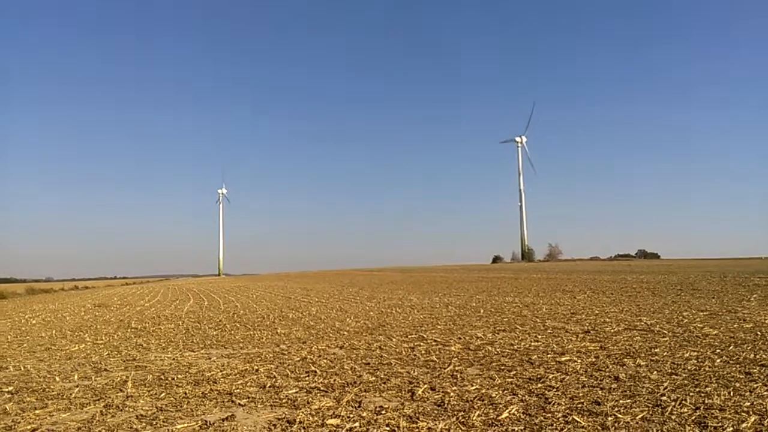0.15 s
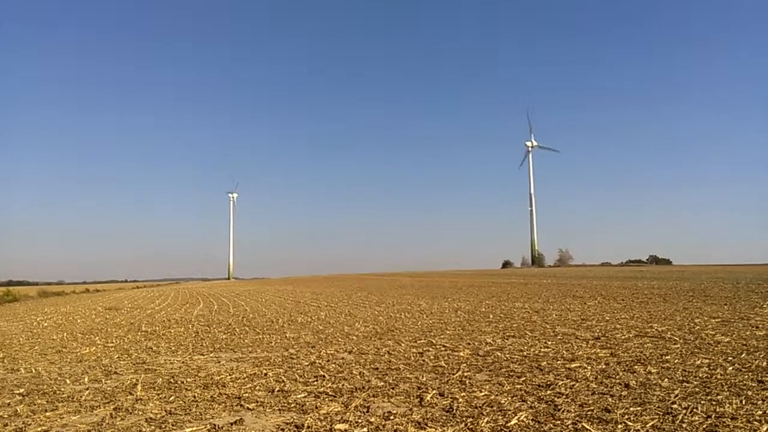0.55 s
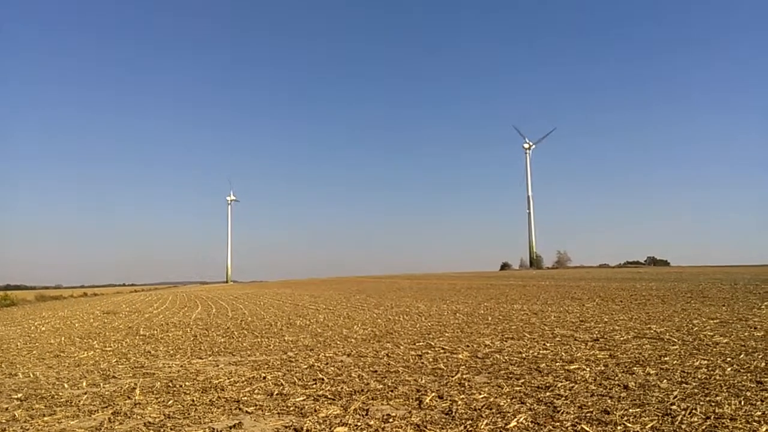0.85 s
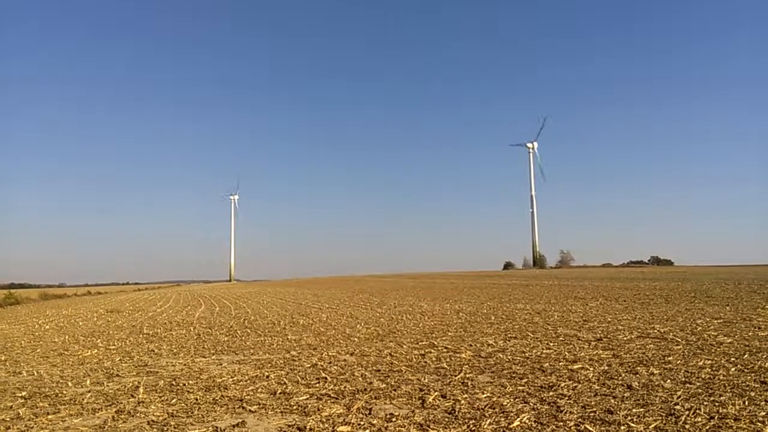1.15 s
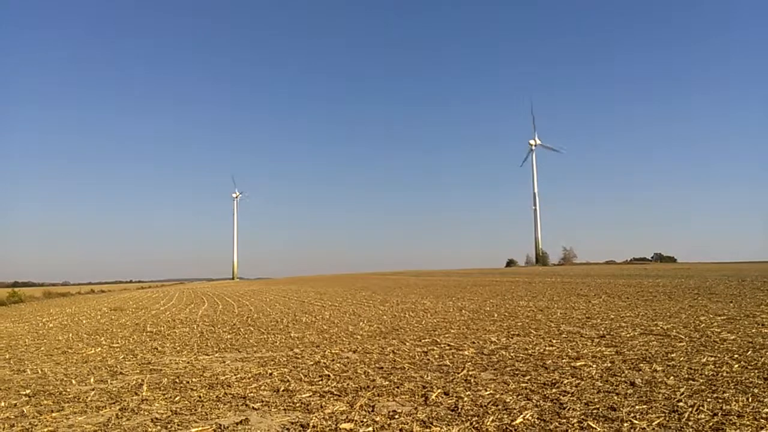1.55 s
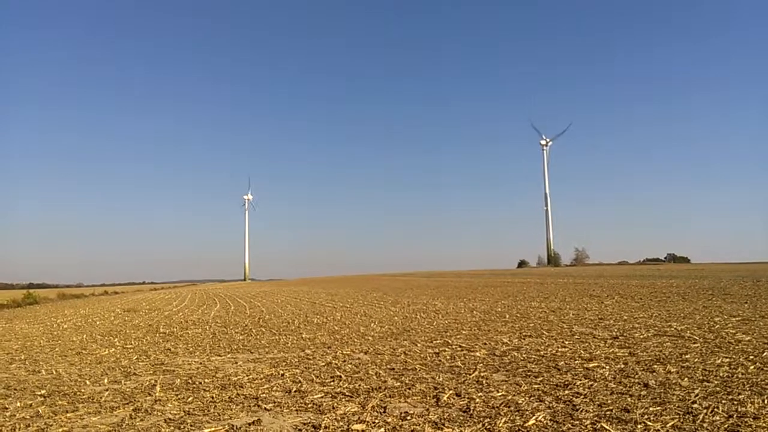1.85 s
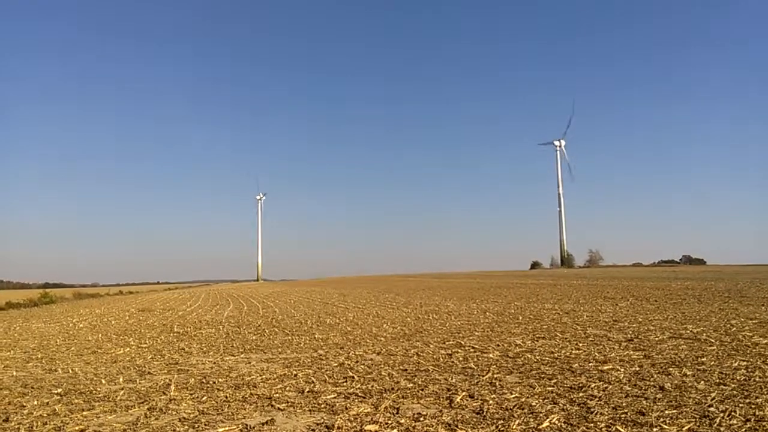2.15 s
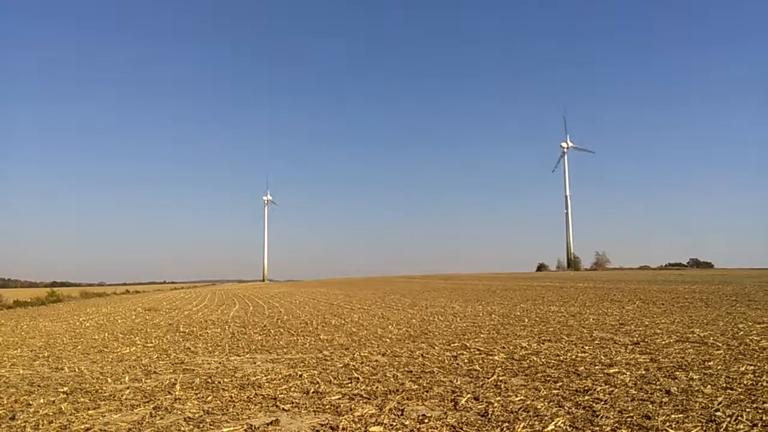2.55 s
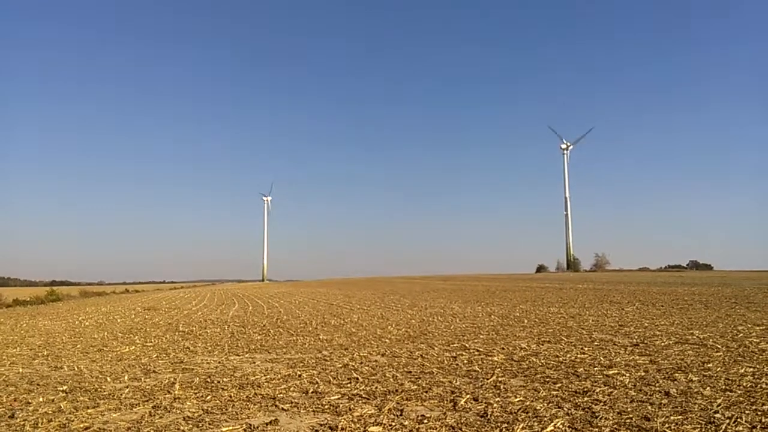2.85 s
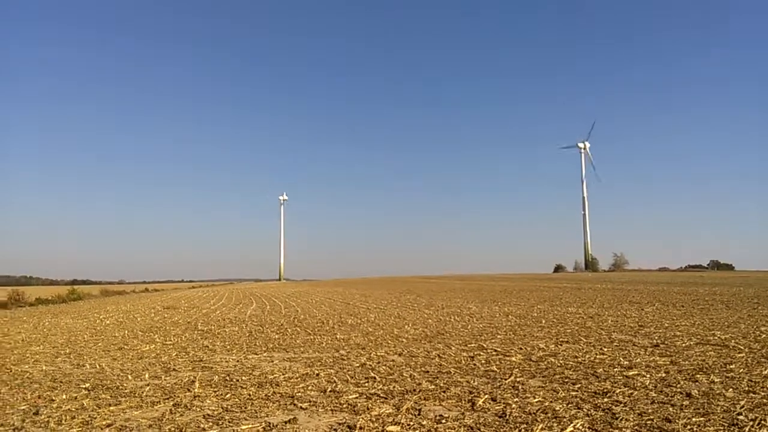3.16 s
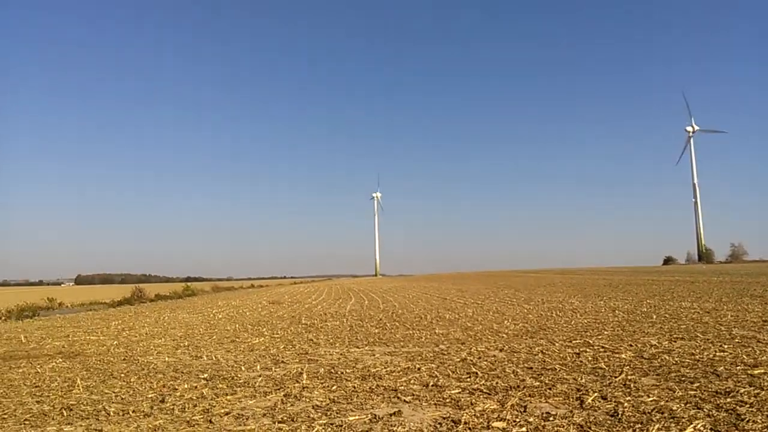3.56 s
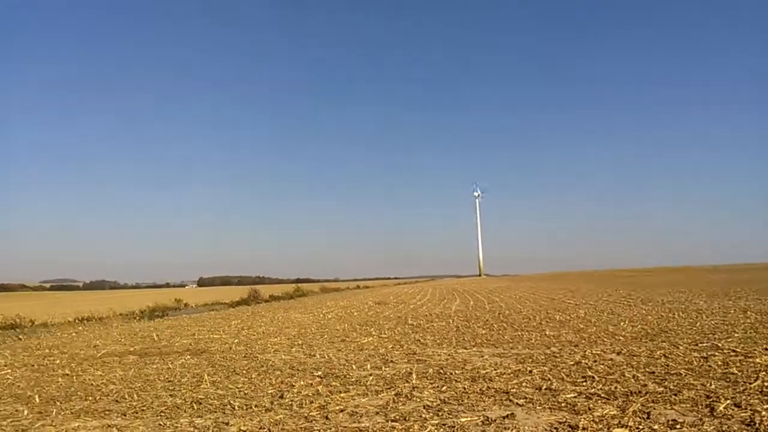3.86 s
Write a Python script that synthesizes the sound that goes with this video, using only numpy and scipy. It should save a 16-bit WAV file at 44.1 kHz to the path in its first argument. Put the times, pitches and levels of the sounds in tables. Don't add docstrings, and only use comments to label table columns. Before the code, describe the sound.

Gusty wind buffets a bare microphone in an open field: deep, irregular thumps and flutters, dense until 1.4 s, with tiny buzzes near 0.5 s, patchier afterward, surging at 2.3-2.9 s, then mostly calm with blows near 3.6 s. Far beneath, turbine blades swish softly about every 0.66 s over a faint drone and rumble. Thin insect notes come after 2.2 s, clearest near 3.5; dry stalks rustle, snapping faintly at 3.8 and 3.95.

```python
import sys
import numpy as np
from scipy import signal
from scipy.fft import rfft, irfft
from scipy.io import wavfile
from scipy.ndimage import uniform_filter1d

SR = 44100
rng = np.random.default_rng(int(sys.argv[2]) if len(sys.argv) > 2 else 0)


def wav_record(signal):
    frames = np.transpose(np.atleast_2d(signal))
    bounded = np.clip(frames, -1, 1)
    quanta = np.round(bounded * 32767).astype(np.int16)
    wavfile.write(sys.argv[1], SR, quanta)


def linear_from_db(decibels):
    return 10 ** (np.asarray(decibels, float) / 20)


N = 176400

# time_s, level_db, speed_octaves (re mean)
GUSTS = [(0, -18, -0.7), (.2, -25, -0.067), (.35, -21, -0.19), (.65, -26, -0.1), (.9, -31.5, -0.67),
         (1.07, -36, -0.0035), (1.11, -22.5, -0.085), (1.44, -30.5, -0.38), (1.48, -51, 0.7),
         (1.66, -67, 0.084), (1.68, -29, -0.5), (1.99, -33.5, -0.061), (2.07, -67, 0.0013),
         (2.12, -26.5, -1.15), (2.6, -27, -0.075), (2.95, -28.5, -0.028), (3.0, -44.5, -1.1),
         (4, -59, -0.5)]
# start_s, peak_db, speed_octaves, length_s
EDDIES = [(0.05, -23.5, 0.62, 0.027), (0.217, -16, 0.82, 0.055), (0.244, -17.5, 1.1, 0.058),
          (0.395, -17.5, 0.97, 0.079), (0.458, -16, 1.1, 0.036), (0.502, -17, 1.4, 0.013),
          (0.544, -15.5, 0.43, 0.024), (0.712, -11, 0.3, 0.0068), (0.759, -16, -0.21, .045),
          (1.108, -16.5, 0.14, 0.012), (1.151, -12.5, 0.19, 0.014), (1.185, -18, 1.15, 0.034),
          (1.231, -14, 0.6, 0.076), (1.329, -13, 0.52, 0.012), (1.679, -20.5, 1, 0.012),
          (1.697, -13.5, -0.76, 0.036), (1.749, -19, 0.53, 0.012), (1.835, -24.5, 0.73, 0.055),
          (1.966, -23, 1.1, 0.0032), (2.266, -18, 0.82, 0.016), (2.317, -23.5, 0.4, 0.096),
          (2.549, -26.5, .9, 0.0083), (2.672, -16, 1.17, 0.1), (2.763, -15.5, 0.83, 0.084),
          (2.849, -17, 0.38, 0.016), (3.415, -23.5, -0.0084, 0.041), (3.542, -26, 0.91, 0.023),
          (3.595, -17, -0.38, 0.023), (3.716, -13.5, -0.5, 0.013), (3.923, -20, 0.13, 0.042)]
# start_s, peak_db, speed_octaves, length_s
MORE_EDDIES = [(.005, -17, 0.3, 0.043), (0.122, -22.5, 0.087, 0.094), (0.862, -17.5, -0.28, 0.036),
               (0.927, -19, -.4, 0.012), (1.103, -28, .3, 0.021), (1.379, -23, 0.1, 0.013),
               (1.432, -35, -0.37, 0.013), (1.926, -33, -0.5, 0.065), (2.108, -22, -0.56, 0.016),
               (2.453, -27, 0.37, 0.093), (2.495, -21.5, -0.11, 0.048), (2.594, -16.5, 0.2, 0.011),
               (2.91, -20, 0.35, 0.013), (3.248, -35, -0.59, 0.032), (3.313, -35, -0.17, 0.029),
               (3.491, -24, 0.096, 0.016), (3.653, -25.5, -0.26, 0.066), (3.755, -27, 0.04, 0.044)]
# freq_hz, level_db_per_hz
WIND_COLOUR = [(25, -9.5), (60, 8.5), (110, 3), (200, -7), (350, -24), (600, -50.5), (1000, -74.5),
               (3000, -120)]
# start_s, peak_db, pitch_hz
FLICKS = [(0.232, -25.5, 494), (0.271, -20.5, 418), (.464, -21, 550), (.482, -30, 600), (.504, -34.5, 446),
          (0.568, -41, 347), (1.192, -33.5, 700), (1.217, -29.5, 522), (1.244, -30.5, 504),
          (1.343, -25.5, 390), (2.507, -45, 566), (2.558, -38, 478), (2.612, -28, 297), (2.72, -33, 590),
          (2.80, -40.5, 500), (2.698, -24.5, 434), (2.769, -23.5, 480), (2.854, -24.5, 370),
          (3.565, -17, 378), (3.772, -34, 417)]
# middle_s, peak_db, pitch_hz, half_length_s
WHORLS = [(0.018, -18, 91, 0.019), (.222, -18.5, 150, 0.0038), (.26, -14.5, 105.7, 0.016),
          (.33, -19, 65.7, 0.014), (.495, -11, 177.7, 0.011), (0.513, -15.5, 241, 0.0062),
          (0.577, -23.5, 248, .006), (.562, -15, 169.3, 0.02), (0.658, -19, 82, 0.01),
          (0.722, -16.5, 115, 0.011), (.865, -23, 147, 0.0124), (1.119, -13.5, 179, 0.0028),
          (1.215, -19, 70, 0.016), (1.25, -21, 187.4, 0.012), (1.33, -9.5, 115, 0.0054),
          (1.44, -22.5, 66.4, 0.0047), (1.688, -21.5, 170, 0.0047), (1.883, -23, 91, 0.0053),
          (1.919, -18.5, 81, .008), (2.129, -20.5, 79, 0.0034), (2.278, -19, 133, 0.0072),
          (2.33, -15, 128, 0.004), (2.39, -19, 128.2, 0.015), (2.455, -21.5, 75.3, 0.017),
          (2.512, -15, 130, 0.0081), (2.643, -15, 84.7, .008), (2.699, -11, 87.6, 0.0057),
          (2.718, -15, 242.6, .006), (2.744, -13, 76.6, 0.0053), (2.802, -13.5, 217, .01),
          (2.832, -20.5, 131, 0.018), (2.855, -13, 188, 0.0027), (3.545, -27.5, 136, 0.0091),
          (3.572, -26.5, 142, 0.0047), (3.775, -23.5, 259, 0.0021), (3.95, -29, 84, 0.022)]
# start_s, length_s, level_db
BUZZES = [
    (0.483, 0.0039, -81.5),
    (0.489, 0.0068, -72),
    (0.508, 0.007, -69),
    (0.545, .006, -79),
    (1.265, .01, -71.5),
    (2.695, 0.0091, -78.5),
    (2.723, 0.0083, -75),
    (2.762, .008, -75),
    (2.78, 0.009, -83.5),
]
# middle_s, swish_db, tip_hiss_db, swish_half_length_s
BLADE_PASSES = [
    (0.19, -56.5, -71, 0.13),
    (0.815, -56.5, -61.5, 0.12),
    (1.51, -58, -66.5, 0.1),
    (2.188, -57.5, -66, 0.15),
    (2.842, -59.5, -63, 0.1),
    (3.493, -56.5, -67.5, 0.098),
    (4.1, -69, -72, 0.19),
]
# freq_hz, level_db_per_hz
SWISH_COLOUR = [(300, -6), (750, 5), (1900, -3.5), (2620, -0.5), (2800, -13), (4350, -17.5), (4700, -27),
                (6000, -29)]
# freq_hz, level_db_per_hz
HISS_COLOUR = [(3500, -15), (5000, -16.5), (6500, -5.5), (8100, 2.5), (9500, -5.5), (11000, -14.5),
               (13000, -24)]
# time_s, level_db
RUSTLE = [(0.0, -69), (.33, -69.5), (.44, -73), (.56, -70), (.67, -64.5), (.76, -73.5), (1.05, -71.5),
          (1.45, -72), (1.85, -74.5), (2.05, -76), (2.4, -70.5), (2.6, -69), (2.75, -69), (3.15, -72.5),
          (3.4, -68), (3.7, -68), (3.88, -67.5), (4.0, -73)]
# middle_s, level_db
SNAPS = [
    (3.805, -66.5),
    (3.955, -67),
]
# start_s, length_s, level_db
INSECT_PHRASES = [
    (2.211, 0.13, -75),
    (2.485, 0.34, -78),
    (3.024, 0.25, -78),
    (3.477, 0.042, -66),
    (3.58, 0.15, -68),
    (3.776, .12, -95),
]
# freq_hz, level_db_per_hz
FIELD_COLOUR = [(15, -33.5), (25, 1), (76, 0.5), (125, -25.5), (182, -23.5), (230, -27), (420, -32.5),
                (750, -34.5), (1540, -46), (5000, -56.5)]
# freq_hz, level_db_per_hz
SELF_NOISE_COLOUR = [(3000, -3), (5000, -13), (8000, -2), (11000, -11), (14500, -11.5)]

EDDY_RISE_SHARE, EVEN_SHARE = 0.39, 0.43
LUMP_DB, BAND_LUMP_DB, JAB_OCTAVES = 0.5, 3, 0.19
SWISH_SINK_S_PER_OCTAVE, SWISH_WIDEN_PER_OCTAVE, SWISH_REST_DB = 0.01, 0.31, -72.5
TIP_LAG_S, TIP_S = 0.044, 0.06
GROUND_DELAY_S, GROUND_GAIN = 0.002315, 0.087
HUM_HZ, HUM_WIDTH_HZ, HUM_DB = 180.3, 22, -59.5
DUCK_DB_PER_DB, DUCK_KNEE_DB = 0.07, -30.5


def rms_one(x):
    return x / np.sqrt(np.mean(x ** 2) + 1e-20)


def in_time(rows):
    time_s, *columns = np.transpose(rows)
    return [np.interp(np.arange(N) / SR, time_s, column) for column in columns]


def coloured(spectrum, size=N):
    freq_hz = np.arange(size // 2 + 1) * SR / size + 1
    at_hz, level_db = np.transpose(spectrum)
    shape_db = np.interp(np.log(freq_hz), np.log(at_hz), level_db,
                         left=level_db[0] - 21.5, right=level_db[-1] - 31)
    return rms_one(irfft(rfft(rng.standard_normal(size)) * linear_from_db(shape_db), size))


def drift(rate_hz):
    pole = np.exp(-2 * np.pi * rate_hz * 40 / SR)
    noise = rng.standard_normal(N // 40 + 2002)
    slow = signal.lfilter([1], [1, -2 * pole, pole * pole], noise)[2000:]
    return np.interp(np.arange(N) / 40, np.arange(len(slow)), rms_one(slow))


def bump(middle_s, rise_s, fall_s):
    t = np.arange(N) / SR - middle_s
    width_s = np.where(t < 0, max(rise_s, 1e-4), max(fall_s, 1e-4))
    return np.exp(-0.5 * (t / width_s) ** 2)


def gate(start_s, length_s, edge_s):
    t = np.arange(N) / SR - start_s
    return np.clip(np.minimum(t, length_s - t) / edge_s + 0.5, 0, 1)


def split(x, centres_hz):
    freq_hz = np.arange(len(x) // 2 + 1) * SR / len(x) + 1
    place = np.interp(np.log(freq_hz), np.log(centres_hz), np.arange(len(centres_hz)))
    whole = rfft(x)
    bands = []
    for k in range(len(centres_hz)):
        weight = np.cos(np.pi / 2 * np.clip(place - k, -1, 1)) ** 2
        bands.append(irfft(whole * weight, len(x)))
    return bands


def patchy(x, flicker_db, rate_hz):
    bands = split(x, np.geomspace(4000, 13000, 7))
    return sum(linear_from_db(flicker_db * drift(rate_hz)) * band for band in bands)


def evened(x, window, floor):
    return x / (uniform_filter1d(x ** 2, size=window) + floor) ** (EVEN_SHARE / 2)


def wind():
    level_db, octaves = in_time(GUSTS)
    power = linear_from_db(level_db) ** 2
    pace = power * octaves
    for start_s, peak_db, octave, length_s in EDDIES + MORE_EDDIES:
        rise_s = EDDY_RISE_SHARE * length_s
        lump = (linear_from_db(peak_db - 3.5) * bump(start_s + rise_s, rise_s, length_s - rise_s)) ** 2
        power = power + lump
        pace = pace + lump * octave
    jab = 1.7 * np.tanh(drift(44.6))
    speed = 2 ** (uniform_filter1d(pace / power, size=300) + JAB_OCTAVES * jab)

    centres_hz = np.geomspace(28, 1600, 13)
    at_hz, colour_db = np.transpose(WIND_COLOUR)
    flow, total = 0, 0
    for hz, band in zip(centres_hz, split(coloured([(10, 0), (5000, -27)]), centres_hz)):
        band = evened(rms_one(band), int(3 * SR / hz), 0.025)
        gain = linear_from_db(np.interp(np.log(hz / speed), np.log(at_hz), colour_db)) * np.sqrt(hz)
        flow = flow + gain * linear_from_db(BAND_LUMP_DB * drift(21)) * band
        total = total + gain ** 2
    flow = evened(flow / np.sqrt(total), 1200, 0.42)
    return np.sqrt(power) * linear_from_db(LUMP_DB * jab) * flow


def flicks():
    t, out = np.arange(N) / SR, 0
    for start_s, peak_db, hz in FLICKS:
        width_s = 0.27 / hz
        swing = np.sin(2 * np.pi * hz * (t - start_s) + rng.uniform(0, 2 * np.pi))
        out = out + linear_from_db(peak_db) * bump(start_s + 0.0028, width_s, width_s) * swing
    return out


def whorls():
    t, out = np.arange(N) / SR, 0
    for middle_s, peak_db, hz, half_s in WHORLS:
        wave = np.sin(2 * np.pi * hz * (t - middle_s) + rng.uniform(0, 2 * np.pi))
        out = out + linear_from_db(peak_db) * bump(middle_s, half_s, half_s) * wave
    return out


def first_push():
    return linear_from_db(-27.5) * bump(0, 0.0035, 0.0035)


def buzz():
    bands = []
    for hz in (5800, 11600):
        sos = signal.butter(3, [hz - 300, hz + 300], "band", fs=SR, output="sos")
        bands.append(rms_one(signal.sosfilt(sos, rng.standard_normal(N))))
    level = sum(linear_from_db(db) * gate(start_s, length_s, 0.004) for start_s, length_s, db in BUZZES)
    return (bands[0] + linear_from_db(-1.5) * bands[1]) * level


def swish():
    centres_hz = np.geomspace(350, 6000, 20)
    t = np.arange(0, N, 64) / SR
    middle_s, db, _, half_s = np.transpose(BLADE_PASSES)[:, :, None]
    out = 0
    for hz, band in zip(centres_hz, split(coloured(SWISH_COLOUR), centres_hz)):
        octaves_down = np.log2(2000 / hz)
        late_s = t - middle_s - SWISH_SINK_S_PER_OCTAVE * octaves_down
        width_s = half_s * (1 + SWISH_WIDEN_PER_OCTAVE * octaves_down)
        swell = linear_from_db(db) * np.exp(-0.5 * (late_s / width_s) ** 2)
        level = np.interp(np.arange(N) / SR, t, swell.sum(axis=0) + linear_from_db(SWISH_REST_DB))
        out = out + level * linear_from_db(3.2 * drift(5.6)) * band
    return out


def blades():
    direct = swish()
    return direct + GROUND_GAIN * np.roll(direct, int(GROUND_DELAY_S * SR))


def tip_hiss_and_rustle():
    tip = sum(linear_from_db(db) * bump(s + TIP_LAG_S, TIP_S, TIP_S) for s, _, db, _ in BLADE_PASSES)
    stalks = linear_from_db(in_time(RUSTLE)[0])
    return np.hypot(tip, stalks) * patchy(coloured(HISS_COLOUR), 2.8, 13.0)


def hum():
    low_hz, high_hz = HUM_HZ - HUM_WIDTH_HZ, HUM_HZ + HUM_WIDTH_HZ
    return linear_from_db(HUM_DB) * coloured([(low_hz, -15), (HUM_HZ, 0), (high_hz, -15)])


def insect():
    pitch_hz = 8119 + 3.3 * drift(6.4)
    note = np.sqrt(2) * np.sin(2 * np.pi * np.cumsum(pitch_hz) / SR)
    phrases = sum(linear_from_db(db) * gate(start_s, length_s, 0.01) for start_s, length_s, db in INSECT_PHRASES)
    return note * linear_from_db(2.7 * drift(16)) * phrases


def snaps():
    noise = coloured([(2500, 5), (4000, 5.5), (5700, -1), (7000, -10), (12000, -23)])
    return noise * sum(linear_from_db(db) * bump(middle_s, 0.012, 0.012) for middle_s, db in SNAPS)


def field():
    return linear_from_db(-41.5 + 2.0 * drift(2.0)) * coloured(FIELD_COLOUR)


def self_noise():
    return linear_from_db(-78) * coloured(SELF_NOISE_COLOUR)


def scene():
    blow = wind() + flicks() + first_push()
    loud_db = 10 * np.log10(uniform_filter1d(blow ** 2, size=5000) + 1e-9)
    duck = linear_from_db(-DUCK_DB_PER_DB * np.maximum(loud_db - DUCK_KNEE_DB, 0))
    turbines = blades() + tip_hiss_and_rustle() + hum()
    background = turbines + insect() + snaps() + field() + self_noise()
    return (blow + whorls() + buzz() + duck * background)[None]


def low_pass(x):
    return signal.sosfilt(signal.butter(12, 14230, fs=SR, output="sos"), x)


def record(dry):
    x = signal.sosfilt(signal.butter(3, 51.2, "high", fs=SR, output="sos"), dry)
    mix = 0.41 * np.tanh(x / 0.58)
    return low_pass(mix)


dry = scene()
out = record(dry)
wav_record(out)
```